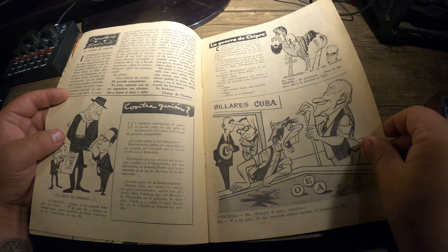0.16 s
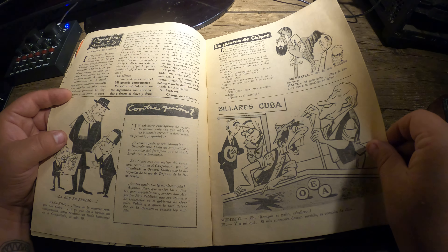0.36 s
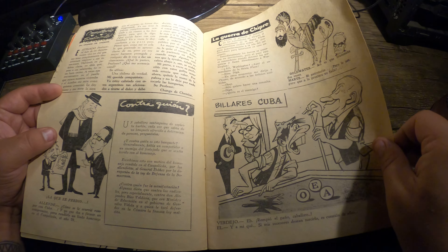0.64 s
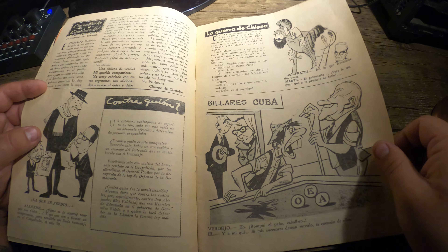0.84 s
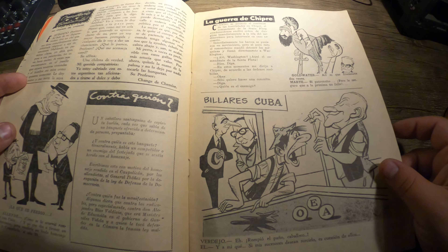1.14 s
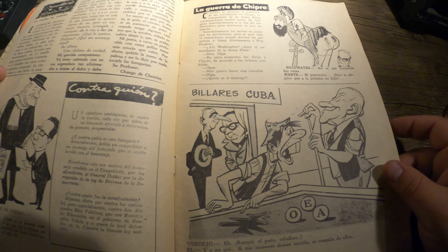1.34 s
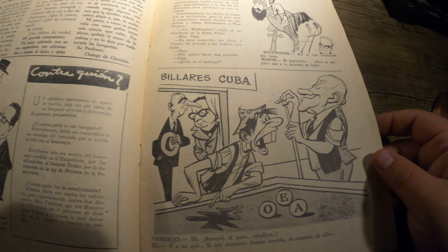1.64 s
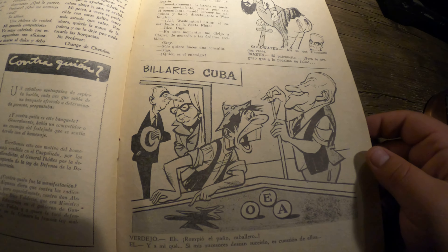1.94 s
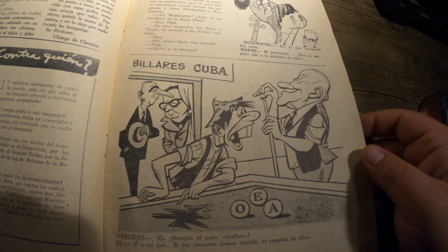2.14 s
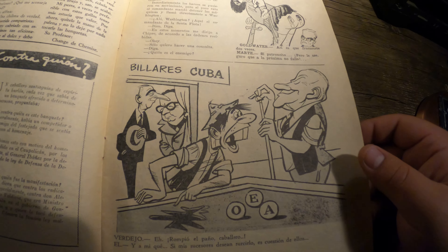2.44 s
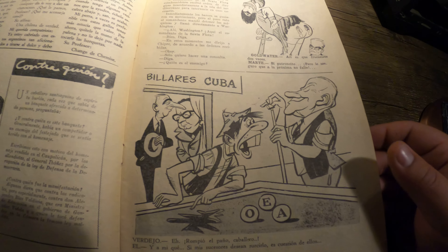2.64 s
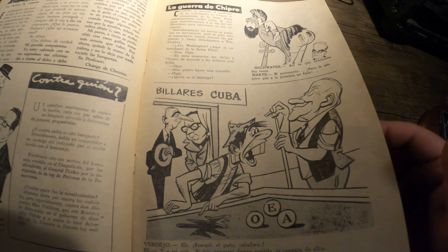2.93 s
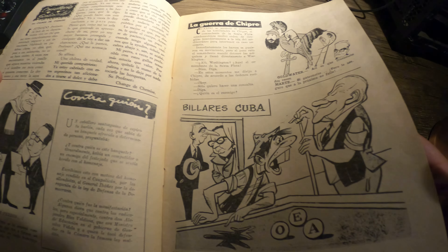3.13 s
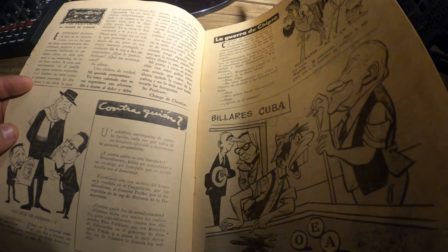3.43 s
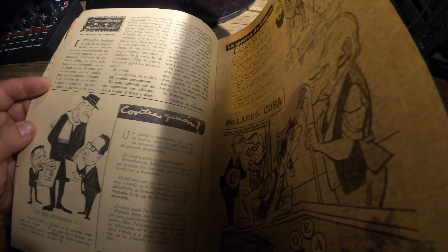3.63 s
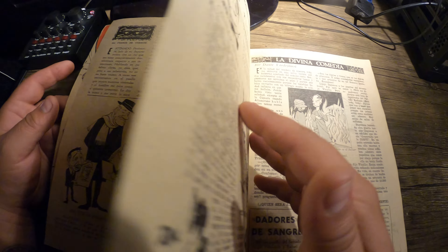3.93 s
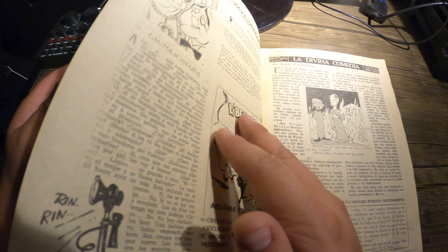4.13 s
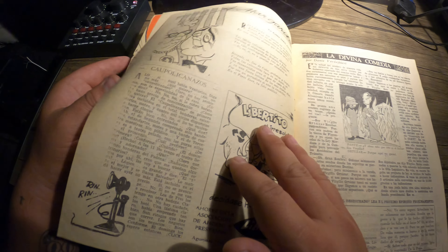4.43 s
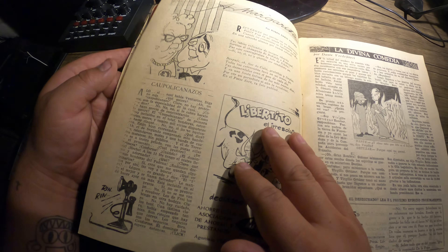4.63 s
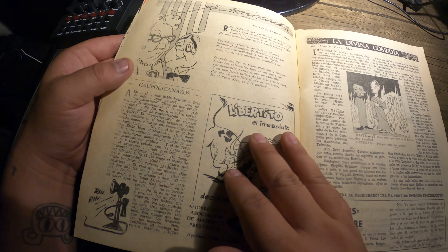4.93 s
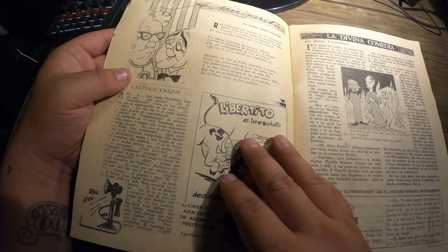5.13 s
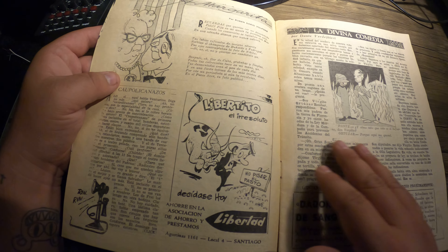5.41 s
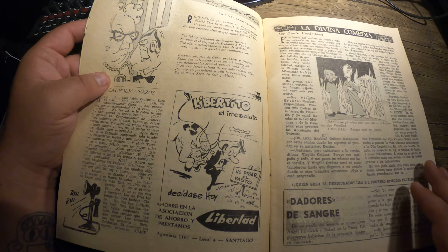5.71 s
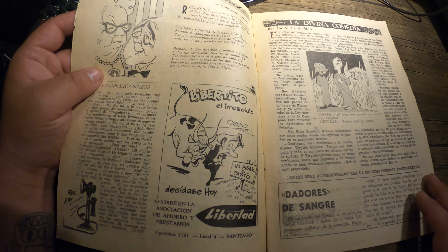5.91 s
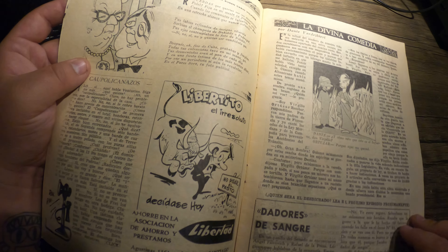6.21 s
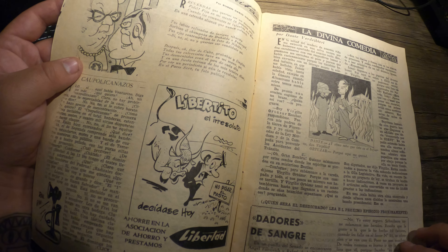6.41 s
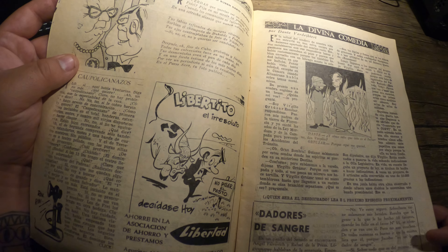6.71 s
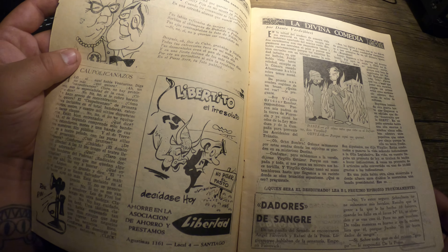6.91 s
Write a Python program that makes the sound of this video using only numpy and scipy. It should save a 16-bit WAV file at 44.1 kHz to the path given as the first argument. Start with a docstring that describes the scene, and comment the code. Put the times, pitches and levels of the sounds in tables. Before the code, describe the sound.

Close stereo sound of an old, dry magazine handled in a small quiet room with short, dull reflections, low uneven rumble, faint hiss and barely noticeable hum. At 0.15 s a brittle crinkle comes with a soft low thump; small crackles follow at 0.27 and 0.36-0.5. From 0.53 to 0.85 rubbing is brighter and busier, with crisp ticks at 0.65 and 0.77. A swishing slide around 1.0-1.3 fades; a light crease pops at 1.54. It is nearly still around 1.9-2.7. From 2.95 to 4.2 soft papery swishes accompany the lifting page, with tiny ticks. Faint sliding continues until snaps gather at 4.59-4.64 and burst into the loudest, sharp crackle at 4.67, dying quickly. A palm then brushes quietly, tapping at 5.25. Smoothing strokes grow from 5.4, with a soft bump and crackle at 6.22, brighter rubbing around 6.4-6.9, and a low muffled thump at 6.82 before it fades.

```python
"""Paper rubs close by as fingers lift a page of an old magazine: friction as dense random fibre slips in bands,
with narrow gliding swishes. Buckles (noise avalanches) and creases (impulses) ring the sheet; the loudest
crackle flips it over, then a palm smooths it down. Decaying low sines are puffs of pushed air, soft bumps of
the hand and a ringing desk. A small room answers with dull reflections, over shaped-noise rumble, faint hiss
and sine hum."""
import sys
import numpy as np
from scipy import signal
from scipy.fft import rfft, irfft
from scipy.io import wavfile

SR = 44100
rng = np.random.default_rng(int(sys.argv[2]) if len(sys.argv) > 2 else 0)


def dump(signal):
    """Clip the signal to [-1, 1] and save it as 16-bit WAV at the path in sys.argv[1]."""
    limited = np.clip(np.atleast_2d(signal).T, -1, 1)
    pcm = np.round(limited * 32767).astype(np.int16)
    wavfile.write(sys.argv[1], SR, pcm)


N = 311328

# Spectrum of cracking paper. Each row: frequency in Hz, relative level in dB per Hz.
CRACK_COLOUR = [(100,-2), (400,-3), (600,-5), (800,0), (950,-1.5), (1300,2.5), (1650,-2), (2300,-3),
                (3200,-4), (4000,-7), (5000,-5.5), (7500,-9.5), (9000,-18.5), (12500,-19), (15000,-39)]
# Delay of the left port in seconds, for rubbing and room tone and for buckles and creases.
RUB_LAG_S, SNAP_LAG_S = 5.1e-5, 3.2e-5


def from_db(db):
    """Amplitude gain is ten to the power of decibels over twenty."""
    return np.exp(np.asarray(db) * (np.log(10) / 20))


def rms_one(x):
    """Normalisation to unit mean power."""
    return x / np.sqrt(np.mean(x ** 2) + 1e-20)


def at_hz(points, hz):
    """Linear interpolation of a spectrum along a log-frequency axis."""
    f, value = np.transpose(points)
    return np.interp(np.log(np.maximum(hz, 1)), np.log(f), value)


def drift(rate):
    """Random modulation: unit-normal values, rate of them a second, joined by straight lines."""
    return np.interp(np.arange(N) / SR * rate, np.arange(N), rng.standard_normal(N))


def pan(db):
    """Left-right level difference at constant total power."""
    gains = from_db(np.array([[.5], [-.5]]) * db)
    return gains / np.sqrt(np.mean(gains ** 2, axis=0))


def two_ports(pair, hz, compact=1):
    """Interaural-style coherence: sum and difference of unrelated sounds set the ports' correlation."""
    # Each row: frequency in Hz, correlation of the two ports.
    likeness = [(60, .96), (150, .93), (300, .84), (600, .98), (2000, .98), (4000, .9), (8000, .62),
                (14000, .4)]
    alike = np.clip(compact * at_hz(likeness, hz), 0, 1)   # a broad source is heard less alike
    common = np.sqrt(1 + alike) * pair[0]
    opposed = np.sqrt(1 - alike) * pair[1]
    return common + opposed * np.array([[1], [-1]])


def left_later(x, lag_s):
    """Path difference: a linear phase shift delays the left port."""
    turn = np.exp(-2j * np.pi * np.fft.rfftfreq(N, 1 / SR) * lag_s)
    return np.array([irfft(rfft(x[0]) * turn, N), x[1]])


def causal(level_db):
    """Minimum phase by folding the cepstrum: nothing sounds before its cause."""
    cepstrum = irfft(np.log(from_db(level_db)))
    half = len(cepstrum) // 2
    cepstrum[1:half] *= 2
    cepstrum[half + 1:] = 0
    return np.exp(rfft(cepstrum))


def resonances(table, hz):
    """Resonance curves summed as lift in dB; a negative lift is a dip."""
    return sum(lift / (1 + (2 * (hz - f) / width) ** 2) for f, width, lift in table)


def fibres(shape, per_s, spread_db):
    """Shot noise: fibre slips are random clicks, whose spread in dB makes a few of them stronger."""
    born = rng.random(shape) < per_s / SR
    strength = from_db(spread_db * np.minimum(rng.exponential(1, shape), 4))
    return rms_one(born * rng.standard_normal(shape) * strength)


def sliding(grain_db, judder_db, patchy_db, bow_octaves, gap_octaves):
    """Stick-slip friction: dense fibre slips in bands, coloured by the moving resonance of the sheet."""
    # Spectrum of rubbing. Each row: frequency in Hz, relative level in dB per Hz.
    rub_colour = [(350, -17.5), (500, -1), (800, -18.5), (950, -3.5), (1200, -1), (1700, -1), (2700, 0),
                  (4000, -3.5), (5400, -2.5), (7600, -5.5), (9000, -16), (10800, -19), (12800, -22.5),
                  (15000, -39)]
    # Fixed resonances and dips. Each row: frequency in Hz, width in Hz, lift in dB.
    rub_rings = [(870, 110, -4), (1060, 220, 2.5), (3040, 330, -3.5), (3700, 500, 1.2), (7550, 500, 4),
                 (8200, 600, -4)]
    slips = fibres((2, 2, N), per_s=16000, spread_db=0.0)
    slips = slips + from_db(-8) * fibres(N, per_s=220, spread_db=0.0)   # now and then a coarser fibre lets go
    grip_db = grain_db * drift(600) + judder_db * drift(45)   # the contact catches and lets go
    edges = np.r_[220, 350, 520, np.geomspace(720, 15800, 21)]   # band limits in Hz
    out, power = 0, 0
    for k, (low, high) in enumerate(zip(edges, edges[1:])):
        hz = np.sqrt(low * high)
        band_pass = signal.butter(2, [low, high], "band", fs=SR, output="sos")
        band = signal.sosfilt(band_pass, slips[k % 2])
        share = from_db(at_hz(rub_colour, hz)) * np.sqrt(high - low)
        patches = from_db(patchy_db * drift(30))
        gain = share * stroke_gain(hz, bow_octaves, gap_octaves) * patches
        out = out + gain * rms_one(two_ports(band, hz, compact=0.7))
        power += share ** 2
    rubbing = out / np.sqrt(power) * from_db(grip_db)
    rings = causal(resonances(rub_rings, np.fft.rfftfreq(N, 1 / SR)))
    return left_later(irfft(rfft(rubbing) * rings, N), RUB_LAG_S)


def stroke_gain(hz, bow_octaves, gap_octaves, size=64):
    """Friction grows with speed: strokes pick up, hold and die while the bent sheet's resonance glides."""
    # Strokes of paper on paper and skin. Each row: start in seconds, length in seconds,
    # relative level in dB, attack in seconds, release time constant in seconds,
    # brightness in dB per octave about 2500 Hz,
    # resonance of the bent sheet at the start in Hz, at the end in Hz, its height in dB,
    # resonance of the gap under the page in Hz, its height in dB, left-right difference in dB.
    strokes = [(-.02, 0.0246, -60, .02, 0.048, -3, 2420, 2250, 6.5, 4400, -1, 4),
               (0.103, 0.19, -60, 0.0098, 0.066, -0.5, 1800, 1800, 1.5, 4400, -8, 1.5),
               (0.352, 0.17, -56, 0.012, 0.0154, -2.5, 1400, 2980, 2, 4500, 6, -1.5),
               (0.533, 0.0193, -44, 0.013, 0.0188, -3.5, 4050, 3840, 13.5, 4500, -1, -1),
               (0.561, 0.0502, -41, 0.018, 0.021, -2.5, 3700, 3200, 11.5, 4280, 2, -2),
               (0.635, 0.033, -43.5, 0.0124, 0.08, -3.5, 3150, 3150, 12.5, 4560, -3, -1.5),
               (0.748, 0.083, -46, 0.021, 0.0292, -1.5, 3000, 3030, 12.5, 4500, 1.5, -1.5),
               (0.843, 0.1, -56, 0.041, 0.01, -3, 2730, 2690, 12, 4440, 4, -2.5),
               (0.989, 0.31, -52, 0.15, 0.046, -0.5, 2260, 2150, 7, 4230, 5.5, -2.5),
               (1.286, 0.31, -61.5, 0.068, 0.06, 0.5, 1785, 1950, 10.5, 4260, 2.5, -0.5),
               (1.578, 0.318, -59, 0.03, 0.036, -1.1, 2130, 2000, 4, 4440, 5, -0.5),
               (1.894, 0.17, -67, 0.02, 0.11, 0.5, 1280, 1406, 9.5, 3950, -5.5, 3.5),
               (2.311, 0.11, -65, 0.037, 0.049, -0.5, 1100, 1200, 4, 3930, -14, 2.5),
               (2.42, 0.13, -59.5, 0.16, 0.39, 0.5, 2300, 2320, 7, 4130, 4, -0.5),
               (2.704, 0.19, -66, 0.11, 0.024, 2, 2400, 2900, 10.5, 5040, 10, -1.5),
               (2.946, 0.27, -57, 0.11, 0.041, 0.3, 1850, 2056, 12.5, 3830, 9, -2),
               (3.203, 0.19, -54.5, 0.044, 0.19, -1, 1650, 1770, 5.5, 3500, 6.5, -0.5),
               (3.452, 0.3, -57.5, 0.15, 0.041, -2, 1610, 1500, 3, 3650, -0.5, -0.5),
               (3.72, 0.21, -50.5, 0.069, 0.052, -2.1, 1920, 1920, -5.5, 3980, 3.5, -0.5),
               (3.928, 0.23, -54.5, 0.051, 0.082, 0, 1100, 1080, 3, 3960, 7.5, 1),
               (4.21, 0.62, -58.5, 0.033, 0.056, -0.8, 1095, 1100, 0, 3630, 4.5, 1),
               (4.77, 0.2, -59.5, 0.02, 0.049, 0.5, 3870, 3860, -3.5, 3960, 10, 0.5),
               (4.933, 0.33, -58.5, 0.15, 0.093, 1.5, 1163, 1193, 5, 3900, 0.5, 0.5),
               (5.253, 0.24, -52, 0.18, 0.044, 1.2, 1100, 1100, 4.5, 4200, -2, 0),
               (5.472, 0.288, -52, 0.079, 0.11, 0.5, 2400, 2850, 4, 4160, 1.5, -2),
               (5.757, 0.22, -55, 0.12, 0.14, -1.2, 1100, 1100, 1, 4250, 3, -0.5),
               (6.12, 0.23, -54.5, 0.067, 0.054, 1, 1100, 1096, 0.5, 4300, 3.5, 0.5),
               (6.214, 0.21, -49.5, 0.19, 0.068, 0.5, 2800, 2980, 2.5, 4230, 4, -0.5),
               (6.469, 0.071, -54, 0.087, 0.185, -0.98, 3400, 3500, 7.5, 4230, 1.5, -1),
               (6.602, 0.21, -51.5, 0.19, 0.051, -0.6, 2820, 2860, 9, 4700, 5.5, -1.5),
               (6.827, 0.096, -51.5, 0.066, 0.0226, -1.5, 3500, 3580, 7.5, 4550, 3, -1),
               (6.921, 0.11, -60, 0.022, 0.028, 0.33, 3700, 4400, -2.5, 4320, 13, 0.5)]
    t, power = np.arange(0, N, size) / SR, 0
    for (start, length, level_db, attack, release, bright, from_hz, to_hz, bow_db,
         gap_hz, gap_db, pan_db) in strokes:
        pick_up = np.sin(np.pi / 2 * np.clip((t - start) / attack, 0, 1)) ** 1.39
        speed = pick_up * np.exp(-np.maximum(t - start - length, 0) / release)
        bow_hz = np.interp(t, [start, start + length], [from_hz, to_hz])
        bow = bow_db * np.exp(-.5 * (np.log2(hz / bow_hz) / bow_octaves) ** 2)
        gap = gap_db * np.exp(-.5 * (np.log2(hz / gap_hz) / gap_octaves) ** 2)
        colour_db = level_db + bright * np.log2(hz / 2500) + bow + gap
        power = power + (speed * from_db(colour_db) * pan(pan_db)) ** 2
    return np.array([np.interp(np.arange(N) / SR, t, side) for side in np.sqrt(power)])


def swishes(fade_share, flutter_db):
    """Cavity resonance: friction rings a narrow pocket under the page, whose pitch glides as it bends."""
    # Slow as the page bends, quick as it slaps down. Each row: start in seconds, length in seconds,
    # relative level in dB, pitch at the start in Hz, at the end in Hz, width in Hz.
    pockets = [(1.069, 0.24, -53.5, 2405, 2284, 600), (1.576, 0.35, -62, 2505, 2637, 450),
               (2.998, 0.22, -55.5, 1606, 1693, 510), (3.517, 0.49, -60, 1860, 2221, 330),
               (4.64, .02, -39, 3980, 3820, 600), (4.671, 0.013, -28.5, 4594, 2960, 900),
               (4.685, .009, -28, 3016, 880, 700), (5.517, 0.29, -57.5, 2620, 2787, 480),
               (6.631, 0.19, -53.5, 2795, 2690, 420)]
    out = np.zeros((2, N))
    for start, length, level_db, from_hz, to_hz, width_hz in pockets:
        t = np.arange(round(length * SR)) / SR
        low_pass = signal.butter(2, width_hz / 2, fs=SR, output="sos")
        pocket = signal.sosfilt(low_pass, rng.standard_normal((2, 2, len(t))))
        # slow noise on a gliding carrier is a narrow moving band
        phase = 2 * np.pi * np.cumsum(np.interp(t, [0, length], [from_hz, to_hz])) / SR
        carried = pocket[0] * np.cos(phase) + pocket[1] * np.sin(phase)
        ring = rms_one(two_ports(carried, from_hz))
        fade = np.clip(np.minimum(t, length - t) / (fade_share * length), 0, 1)
        at = round(start * SR)
        out[:, at:at + len(t)] += (from_db(level_db) * ring * fade)[:, :N - at]
    return left_later(out * from_db(flutter_db * drift(60)), RUB_LAG_S)


def snapping(slips_per_fall, spread_db, ring_from_db, ring_full_db, size=8192):
    """Buckling: an avalanche of fibre slips swells, dies and rings the sheet; a slow one is grainier."""
    # Scuffs and buckles of the sheet. Each row: peak time in seconds, level in dB,
    # fall time constant in seconds, lowest frequency in Hz, highest in Hz, left-right difference in dB.
    buckles = [(0.1495, -31, 0.0031, 500, 5230, -3), (0.1531, -30.5, 0.0027, 400, 7000, -6.5),
               (0.272, -40.5, 0.0064, 120, 5600, -5.5), (.359, -42, 0.013, 2000, 8900, -3),
               (.388, -41, 0.0084, 1510, 7000, -3), (.493, -36, 0.005, 2500, 6070, -2),
               (.605, -39.5, 0.0064, 1500, 4800, 0), (.649, -41, 0.0026, 1500, 4480, -2.5),
               (.7722, -39, 0.0016, 1200, 4400, 1), (1.546, -41, 0.0049, 3000, 2100, 3.5),
               (2.228, -59.5, 0.021, 1200, 7000, -2), (3.612, -45.5, 0.0058, 600, 1150, 0),
               (3.919, -54, 0.0042, 300, 1160, -0.5), (4.182, -49, 0.011, 600, 1490, 1.5),
               (4.617, -29.5, 0.0062, 700, 2000, 0), (4.629, -31.5, 0.014, 500, 2300, 0),
               (4.666, -22, 0.0044, 500, 5000, -2), (4.669, -21.5, 0.0013, 5000, 8000, 4),
               (4.6783, -21, 0.0053, 1500, 2390, 2), (4.703, -39, 0.055, 890, 4600, 5),
               (4.787, -45.5, 0.017, 300, 5000, 0), (6.2234, -37, 0.004, 250, 1870, 2),
               (6.836, -44, 0.011, 700, 3600, 1)]
    rise_share = 0.78   # rise time constant as a share of the fall
    out, hz = np.zeros((2, N + size)), np.fft.rfftfreq(size, 1 / SR) + 1
    t = (np.arange(size) - size // 4) / SR
    ring_db = sheet_ring(hz)
    for s, level_db, fall, low_hz, top_hz, pan_db in buckles:
        swell = np.exp(np.minimum(t / (rise_share * fall), -t / fall))
        slips = rfft(fibres((2, size), slips_per_fall / fall, spread_db) * swell)
        # a small patch of paper gives little bass, a soft contact little treble
        loss_db = 10 * np.log10((1 + (low_hz / hz) ** 2) * (1 + (hz / top_hz) ** 4))
        # only a hard buckle shakes the whole sheet
        ringing = np.interp(level_db, [ring_from_db, ring_full_db], [.25, 1])
        body = causal(at_hz(CRACK_COLOUR, hz) + ringing * ring_db - loss_db)
        burst = rms_one(irfft(two_ports(slips, hz) * body))
        at = max(round(s * SR) - size // 4, 0)
        out[:, at:at + size] += from_db(level_db) * burst * np.sqrt(np.mean(swell ** 2)) * pan(pan_db)
    return left_later(out[:, :N], SNAP_LAG_S)


def ticks(rebound_db, rebound_s, top_ratio, size=8192):
    """Impulse response: a popping crease rings a patch of paper, weak rebounds follow; hard ones ring it all."""
    # Creases that pop and edges that tap. Each row: time in seconds, nominal peak in dB,
    # pitch in Hz, width in Hz, left-right difference in dB.
    creases = [(0.1487, -25, 2800, 3000, 7), (0.2688, -30.5, 1010, 1500, 1),
               (0.6502, -23, 3200, 3000, -1.5), (0.6597, -32, 3400, 2500, -3),
               (0.7123, -34, 3000, 3500, -1.5), (0.77, -22, 3330, 2200, -3.5), (0.7707, -28, 1100, 3000, 0),
               (1.5404, -33.5, 1243, 350, 2.5), (3.1307, -37, 2120, 1500, -6), (3.372, -45, 650, 700, -1),
               (3.7544, -32, 1424, 350, -1), (4.5901, -21.5, 1870, 1300, 0.5), (4.6108, -24, 1290, 600, 2),
               (4.6244, -19.5, 2300, 1500, 5), (4.636, -22.5, 1000, 300, 1), (4.6704, -6, 2010, 1700, 2),
               (4.6748, -14, 2800, 1100, 6), (4.6788, -20.5, 1130, 400, 3), (5.2498, -28.5, 1080, 260, 0.5),
               (5.2497, -40, 2800, 500, 0.5), (6.223, -33, 1740, 600, 0)]
    ring_from_db, ring_full_db = -30, -9   # peaks that ring the sheet not at all and fully
    out, hz = np.zeros((2, N + size)), np.fft.rfftfreq(size, 1 / SR) + 1
    t = np.arange(size) / SR
    ring_db = sheet_ring(hz)
    for s, peak_db, pitch_hz, width_hz, pan_db in creases:
        slips = from_db(rebound_db) * rng.standard_normal((2, size)) * np.exp(-t / rebound_s)
        slips[0, 0] = 1   # the pop itself
        off_pitch = 1 + ((hz ** 2 - pitch_hz ** 2) / (hz * width_hz)) ** 2
        loss = off_pitch * (1 + (hz / (top_ratio * pitch_hz)) ** 4)
        ringing = np.interp(peak_db, [ring_from_db, ring_full_db], [0, 1])
        patch = causal(at_hz(CRACK_COLOUR, hz) + ringing * ring_db - 10 * np.log10(loss))
        tick = irfft(two_ports(rfft(slips), hz) * patch) / (np.sqrt(2) * np.abs(irfft(patch)).max())
        at = round(s * SR)
        out[:, at:at + size] += from_db(peak_db) * tick * pan(pan_db)
    return left_later(out[:, :N], SNAP_LAG_S)


def sheet_ring(hz):
    """Plate modes at constant Q: every mode of the stiff sheet rings for the same number of cycles."""
    # Each row: frequency in Hz, lift in dB.
    modes = [(902,8.5), (1014,15), (1103,4), (1226,12), (1585,2), (1752,3.5), (1942,10), (2204,14.5),
             (2352,8.5), (2479,2), (2618,16.5), (3930,11), (4980,3), (7250,14)]
    q = 21
    return resonances([(f, f / q, lift) for f, lift in modes], hz)


def puffs(rise_s):
    """Damped oscillation: a push of air, a soft bump of the hand or the ringing desk swings the pressure and
    dies."""
    # Each row: start in seconds, nominal peak in dB, pitch in Hz, time to fall by 60 dB in seconds.
    pushes = [(0.1481,-20,176,0.025), (.159,-28,52,0.055), (0.161,-42,106.2,0.31), (4.591,-27,77.4,0.075),
              (4.606,-36,207,0.18), (4.669,-24.5,143,0.047), (5.25,-45,159,0.056), (6.224,-26.5,132,0.018),
              (6.818,-23,60,0.054), (6.94,-39,38.6,0.13)]
    out = np.zeros(N)
    for s, peak_db, hz, t60 in pushes:
        t = np.maximum(np.arange(N) / SR - s, 0)
        decay = from_db(np.maximum(peak_db - 60 * t / t60, -200))
        out += decay * np.sin(2 * np.pi * hz * t) * (1 - np.exp(-t / rise_s))
    return out


def room(x, wall_hz, first_s, alike):
    """Diffuse reverberation: convolution with decaying noise, dulled by the walls of a small room."""
    t60_s = 0.23
    t = np.arange(SR) / SR
    shared, own = rng.standard_normal(SR), rng.standard_normal((2, SR))
    tail = np.sqrt(alike) * shared + np.sqrt(1 - alike) * own
    tail = tail * from_db(-60 * t / t60_s) * np.clip(t / first_s - .5, 0, 1)
    tail = rms_one(tail) / np.sqrt(SR)   # unit energy ahead of the wall loss
    tail = signal.sosfilt(signal.butter(1, wall_hz, fs=SR, output="sos"), tail)
    return signal.fftconvolve(x.mean(0)[None], tail, axes=1)[:, :N]


def room_tone(flutter_db, surge_db):
    """Filtered noise and sines: an uneven low rumble with a faint hiss and a wavering mains hum."""
    # Spectrum of rumble and hiss. Each row: frequency in Hz, relative level in dB per Hz.
    rumble_colour = [(20, -34), (35, -9.5), (50, -6.5), (70, -1), (90, -9), (150, -3.5), (225, -0.5),
                     (265, -10), (335, -10), (370, -18), (700, -29.5), (1200, -33), (3000, -36),
                     (8000, -43.5), (15000, -72)]
    # Mains hum. Each row: frequency in Hz, level in dB ahead of the surge, waver in dB.
    hum_tones = [(48.5, -66, 6), (102.6, -62, 4.5)]
    # Course of the deepest rumble and the hum. Each row: time in seconds, relative level in dB.
    deep_course = [(.3, 3), (.47, -19.5), (.65, 1), (2.2, -3), (2.4, 3), (4.3, -1), (4.6, 8), (5.4, -0.5),
                   (6.5, 1)]
    level_db, surge_top_hz = -55, 131
    hz, t = np.fft.rfftfreq(N, 1 / SR), np.arange(N) / SR
    white = rfft(rng.standard_normal((2, N)))
    noise = rms_one(irfft(two_ports(white, hz) * from_db(at_hz(rumble_colour, hz)), N))
    hum = 0
    for f, db, waver_db in hum_tones:
        strength = from_db(db + waver_db * drift(9)) * np.sqrt(2)
        hum = hum + strength * np.sin(2 * np.pi * f * t + .5 * drift(2.04))
    surge = from_db(np.interp(t, *np.transpose(deep_course)) + surge_db * drift(9.3))
    deep, low = [irfft(rfft(noise) / (1 + (hz / top) ** 8), N) for top in (surge_top_hz, 500)]
    rumble = deep * surge + (low - deep) * from_db(flutter_db * drift(22))
    hiss = noise - low
    return left_later(from_db(level_db) * (rumble + hiss) + hum * surge, RUB_LAG_S)


def scene():
    """Superposition: paper close by, its reflections, and the room's own sound."""
    rub = from_db(0.37) * sliding(grain_db=1.13, judder_db=1.2, patchy_db=1.8,
                                  bow_octaves=0.5, gap_octaves=0.15)
    rub = rub + swishes(fade_share=0.28, flutter_db=3.2)
    snaps = snapping(slips_per_fall=92, spread_db=1.2, ring_from_db=-29, ring_full_db=-11)
    snaps = snaps + ticks(rebound_db=-23.5, rebound_s=0.0031, top_ratio=1.8)
    to_room = from_db(-11) * snaps + from_db(-12.5) * rub
    echo = room(to_room, wall_hz=5980, first_s=0.00555, alike=0.56)
    return rub + snaps + echo + puffs(rise_s=0.00065) + room_tone(flutter_db=2.5, surge_db=1.0)


def record(dry):
    """Linear filtering: the left port of the microphone is duller, and the top is cut steeply."""
    # Each row: frequency in Hz, left-right difference in dB.
    port_balance = [(100, -1), (1500, -0.5), (4000, 0), (8000, -3.5), (12000, -9.5)]
    cutoff_hz = 15600
    balance = pan(at_hz(port_balance, np.fft.rfftfreq(N, 1 / SR)))
    heard = irfft(rfft(dry) * balance, N)
    return signal.sosfilt(signal.ellip(10, .1, 80, cutoff_hz, fs=SR, output="sos"), heard)


dry = scene()
out = record(dry)
dump(out)
```